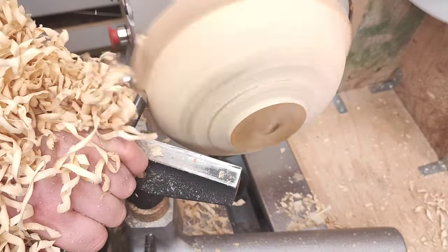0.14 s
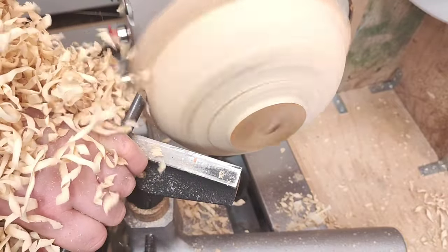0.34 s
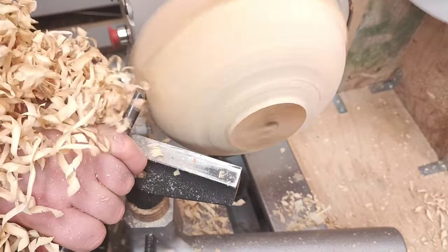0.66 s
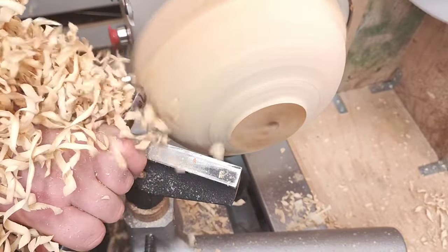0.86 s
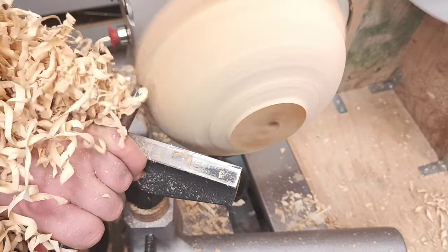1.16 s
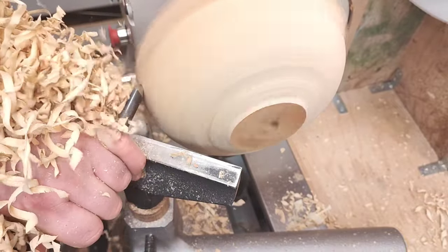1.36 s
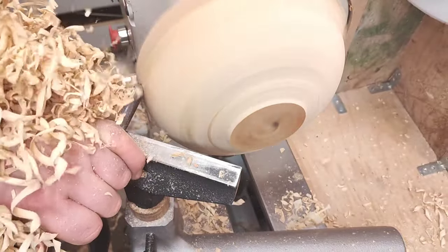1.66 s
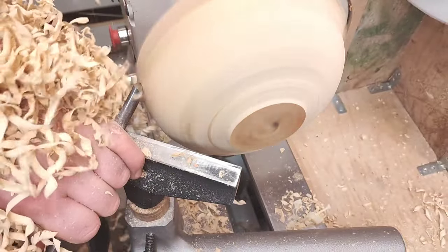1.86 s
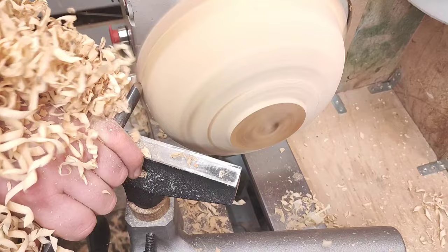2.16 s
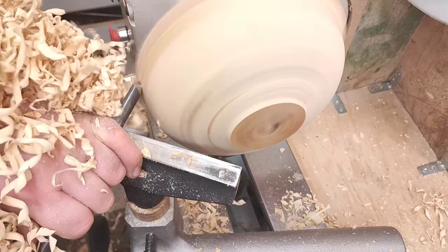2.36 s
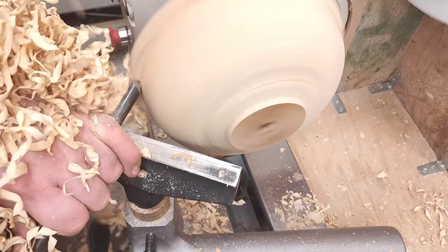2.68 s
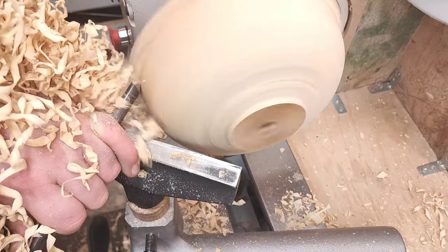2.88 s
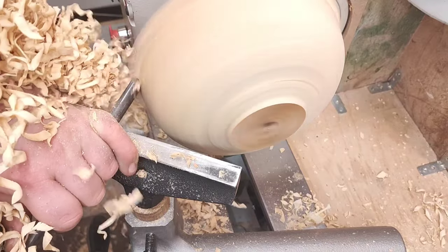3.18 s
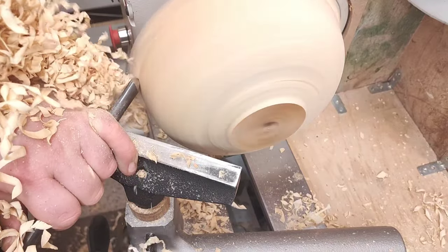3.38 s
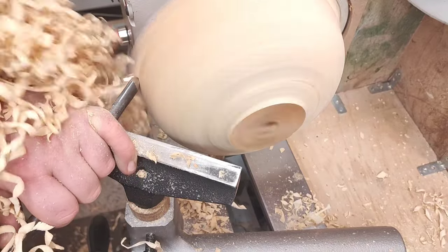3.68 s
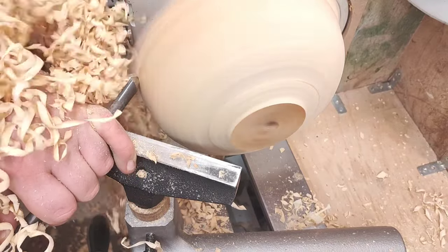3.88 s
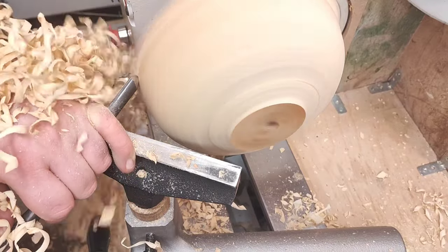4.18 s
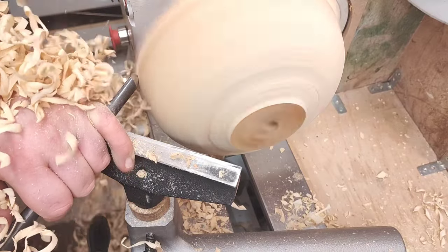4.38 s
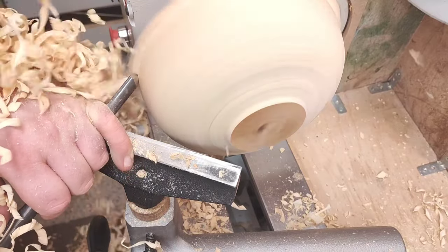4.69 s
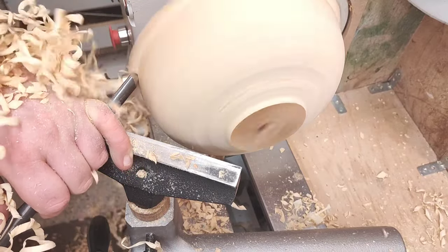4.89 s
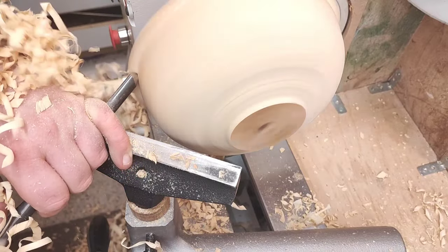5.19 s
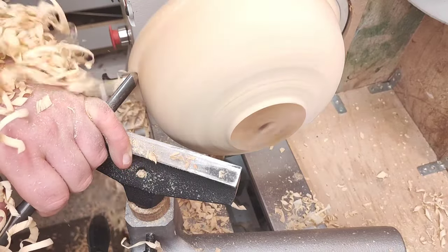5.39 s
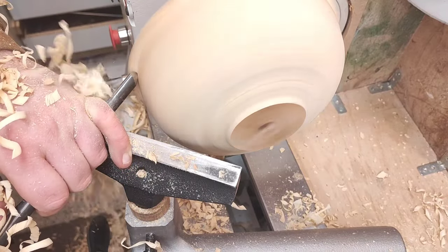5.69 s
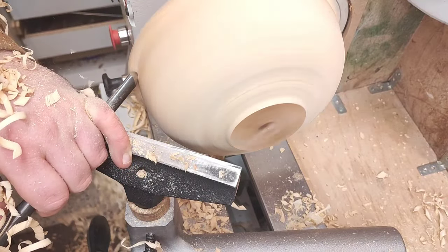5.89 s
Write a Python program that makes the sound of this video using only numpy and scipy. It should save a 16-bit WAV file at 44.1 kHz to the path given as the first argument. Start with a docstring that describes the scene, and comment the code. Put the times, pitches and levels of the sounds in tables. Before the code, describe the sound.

A continuous woodturning cut, heard near the tool with a short room tail. It starts heavy and full, gritty slicing with twice-per-turn hissing tears of end grain and a low thrum. Halfway through, a nasal, buzzing chatter of the thinning bowl wall grows. Later the slicing fades, sharp rapid tearing slides downward in pitch, and finally the cut breaks off above the quiet lathe whirr.

```python
"""Wooden bowl on the lathe

A gouge cuts a bowl spinning about twenty times a second: rasp and slicing are noise that partly repeats every turn.
Twice a turn end grain tears with a hiss, a noise burst with a tail that thins into a falling zip near the rim.
Ripples come round every turn and sound as wavering tones: a thrum, then the chatter of the thinning bowl wall.
Motor hum and a filtered whirr lie below, a short room tail follows the cut, and at last the edge leaves the wood."""
import sys
import numpy as np
from scipy import signal
from scipy.fft import rfft, irfft, next_fast_len
from scipy.io import wavfile
from scipy.ndimage import uniform_filter1d

SR = 44100
rng = np.random.default_rng(int(sys.argv[2]) if len(sys.argv) > 2 else 0)


def wav_record(signal):
    """Record a signal, one row per channel, as 16-bit PCM in the file named by sys.argv[1]."""
    frames = np.transpose(np.atleast_2d(signal))
    bounded = np.clip(frames, -1, 1)
    # unit amplitude maps onto the largest positive 16-bit level
    quanta = np.round(bounded * 32767).astype(np.int16)
    wavfile.write(sys.argv[1], SR, quanta)


N = 266805
TIME = np.arange(N) / SR  # s

SPIN_HZ = 19.91
TOP_HZ = 15900  # upper limit of the whole sound

# where in the turn the edge meets end grain: (time [s], first angle [turns], second angle [turns])
END_GRAIN = [(0, .24, .83), (2, .29, .87), (3, .335, .88), (4.2, .345, .878), (4.9, .37, .892),
             (5.25, .378, .903), (5.55, .362, .897), (5.75, .342, .872), (6.05, .32, .862)]
# how hard the end grain tears, before hand pressure:
# (time [s], level [dB], first pass over the smooth slicing [dB], second pass over it [dB])
TEAR = [(0, -25, 0, 0), (1.3, -22.5, -9, 3.5), (1.8, -27, 6, 6.5), (2.5, -25, 1, 7.5), (2.95, -22.5, 5, 7),
        (3.6, -27.5, 5.5, 8), (4.05, -26, 5, 10.5), (4.7, -30, 4, 9.5), (4.95, -28.5, 6, 14.5),
        (5.2, -25, 13, 18.5), (5.42, -21, 22, 22), (5.6, -19.5, 19, 13), (5.8, -24, 15.5, 8),
        (6.0, -29.5, 11, 15)]
# the thinning shaving's zip: (time [s], pitch [Hz], share of the tearing's power [0-1])
ZIP = [(3.4, 15500, 0.07), (4.55, 14400, 0.04), (4.85, 13400, 0.46), (5.07, 11800, 0.7),
       (5.25, 10300, 0.93), (5.43, 8700, 1), (5.62, 6600, 0.33), (5.8, 4750, 0.29), (6.05, 3880, 0.03)]
# ripples that drive the low wall mode: (ripples [per turn], heavy cut [dB], light cut [dB])
LOW_RIPPLES = [(36, -8, -14), (37, -4, -14), (38, -10, -9), (39, -3, -1), (40, 0, 0), (41, -12, -12),
               (42, -9, -6), (45, -11, -15), (48, -12, -16)]
# ripples that drive the high wall mode: (ripples [per turn], heavy cut [dB], light cut [dB])
HIGH_RIPPLES = [(66, -15, -12), (67, -5, -7), (68, -3, -3), (69, -6, -12), (70, -13, -12), (71, -7, -10),
                (72, -11, -11), (73, 0, 0), (74, -9, -15), (75, -4, -16), (77, -7, -11), (79, -11, -13),
                (82, -13, -16)]
# resonances of bowl, gouge and rest under the rasp:
# (centre [Hz], width [Hz], peak near the foot [dB], peak near the rim [dB])
RINGS = [(785, 250, 8, 13.5), (1605, 230, 6.5, 5.5), (1832, 78, 8, 5), (2190, 37, 12.5, 10),
         (2284, 45, 11, 2.5), (2390, 74, 3.5, 1), (2802, 173, 6.5, 10), (3250, 110, 9.5, 10)]
# colour of the edge rasping through wood: (frequency [Hz], density [dB per Hz])
RASP = [(150, -41), (600, -22.5), (1050, -8.5), (1250, -3.5), (1600, 1.5), (2000, -1), (2500, -0.5),
        (3100, -9.5), (4000, -7.5), (7000, -52)]
# colour of the shaving sliding up the flute: (frequency [Hz], density [dB per Hz])
SLICE = [(1500, -64), (2800, -4), (3500, -0.5), (4400, -2), (5300, 0), (6300, -2.5), (7500, 0),
         (11000, -26), (16000, -40)]
# colour of torn end grain: (frequency [Hz], density [dB per Hz])
HISS = [(2000, -30), (4500, -25), (6400, -7.5), (7300, -2), (8300, 3), (9700, -1), (11200, -1.5),
        (12300, -5), (14000, -7.5), (16000, -26)]
# colour of the rumble under the cut: (frequency [Hz], density [dB per Hz])
RUMBLE = [(20, -37), (62, -46), (80, -12), (140, -11.5), (190, -4.5), (260, 0), (420, -0.5), (600, -2.5),
          (780, 6), (1050, -4), (1200, 4), (1700, -0.5), (3500, -51)]
# colour of belt and bearings: (frequency [Hz], density [dB per Hz])
IDLE = [(30, -32), (60, -28), (100, -16), (300, -0.5), (480, -2.5), (800, 6.5), (1500, 8.5), (3000, -12.5),
        (8000, 5), (16000, -34)]
# room tail: (frequency [Hz], time to fall by 60 dB [s])
WORKSHOP = [(200, 0.25), (1500, 0.52), (6000, .18), (15000, 0.049)]
# sets of ripples that bounce the gouge on its rest: (start [s], end [s], ripples [per turn], level [dB])
THRUM = [(-.1, 0.505, 14, -43.5), (1.22, 1.498, 14, -42.5), (1.22, 1.65, 20, -50), (1.503, 1.98, 14, -39),
         (1.895, 3.2, 17, -46.5), (1.9, 2.8, 57, -45), (1.9, 2.8, 60, -41), (2.75, 4.35, 33, -46.5),
         (2.118, 3.12, 20, -43), (2.683, 4.32, 14, -40), (3.348, 4.3, 17, -43.5), (3.65, 4.3, 20, -47),
         (4.3, 5.1, 17, -47), (4.8, 5.25, 20, -54), (5.1, 6.2, 17, -55), (5.1, 6.2, 57, -51),
         (5.5, 6.2, 14, -52)]
# resonances of the gouge's flute: (centre [Hz], width [Hz], peak [dB])
FLUTE = [(4250, 260, 4.5), (4710, 250, 5), (5220, 82, -4), (6070, 86, 4.5)]
# narrow resonances of tool rest and lathe bed: (centre [Hz], width [Hz], peak [dB])
BED = [(293, 45, 7.5), (489, 56, 6), (1135, 14, 2), (1194, 16, 8.5), (1254, 18, 6)]
# brightness of the rasp: (time [s], tilt of upper against lower part [dB])
BITE = [(0, 4.5), (.35, 3.5), (.65, -.3), (1.4, 2), (1.9, -4), (2.2, -1), (2.4, 3.5), (3, 2.5), (3.4, -1.5),
        (5, -0.5), (5.7, -3.5)]
# depth of cut, shallower towards the rim: (time [s], depth [dB])
DEPTH = [(0, 0.5), (.55, -.5), (1.1, 0.06), (1.7, -2.5), (2.15, -2.2), (2.4, -3.5), (3.0, -2), (3.6, -4),
         (4.15, -4.5), (4.9, -9.5), (5.35, -13.5), (5.75, -13.5), (5.98, -12.5)]
# the hand pushes (+) or eases (-) the gouge for a moment: (centre [s], length [s], push [dB])
NUDGES = [(0.073, 0.073, -4), (0.153, 0.092, 0.5), (.52, .08, -0.2), (0.653, 0.16, 1.3), (0.785, .08, -2),
          (1.462, 0.072, -2.6), (1.56, 0.07, 1.7), (1.78, 0.043, -1.5), (1.81, 0.019, 3), (1.88, 0.018, 3),
          (2.21, 0.088, 1.4), (2.3, 0.11, -1.5), (2.472, 0.049, 1.5), (2.608, 0.055, -2.5),
          (3.06, 0.062, 1), (3.216, 0.24, -2), (3.492, 0.069, 2.5), (3.66, 0.068, -2.5), (4.13, 0.062, 1.4),
          (4.478, .04, 1.3), (4.56, .08, -2.2), (4.664, .08, 1.5), (4.893, .05, -2), (5.086, 0.037, 4.5),
          (5.957, 0.11, 3)]
# growth of the low wall mode as the wall thins:
# (start [s], full [s], level before [dB], level when full [dB], answer to depth [dB per dB])
LOW_CHATTER = (2.5, 4, -42.5, -29.5, 0.14)
# growth of the high wall mode, same columns:
# (start [s], full [s], level before [dB], level when full [dB], answer to depth [dB per dB])
HIGH_CHATTER = (1.98, 3.5, -45, -19.5, 0.78)
# brightness of the tearing above 11.5 kHz: (time [s], level [dB])
TREBLE = [(0, 0), (1.4, -5.5), (1.9, 1.5), (3.6, 0), (4.4, 8), (5.1, 2), (5.5, -8), (5.9, -2.5)]

# the edge leaves the wood: the cut dies at once, the wall rings down
LEAVE_S, CUT_FADE_DB_PER_S, WALL_FADE_DB_PER_S = 5.998, 750, 170
# the edge passes from the stiff foot to the thin wall near the rim
FOOT_UNTIL_S, RIM_FROM_S = 2, 2.72
# depths between which a heavy cut turns into a light one
HEAVY_DB, LIGHT_DB = -4, -8.5
# base levels, before depth, hand and load move them
RASP_DB, SLICE_DB, RUMBLE_DB, HUM_DB = -22.5, -24, -34, -54.5
THRUM_FADE_S = 0.22


def amp(db):
    """Decibels to gain."""
    return 10 ** (np.asarray(db) / 20)


def unit(x):
    """Scaled to rms 1."""
    return x / np.sqrt(np.mean(x ** 2) + 1e-20)


def along(points, hz):
    """(Hz, value) points read on a log axis."""
    f, v = np.transpose(points)
    return np.interp(np.log(hz + 1), np.log(f + 1), v)


def curves(rows):
    """One value per sample for each column after the time."""
    s, *cols = np.transpose(rows)
    return [np.interp(TIME, s, c) for c in cols]


def ramp(start_s, end_s):
    """From 0 to 1 between two moments."""
    return np.clip((TIME - start_s) / (end_s - start_s), 0, 1)


def wobble(rate):
    """A smooth random curve, rate knots a second."""
    knots = 1.15 * rng.standard_normal(int(N * rate / SR) + 4)
    i = (TIME * rate).astype(int)
    u = TIME * rate - i
    ease = u * u * (3 - 2 * u)
    return knots[i] + (knots[i + 1] - knots[i]) * ease


def filtered(x, response):
    """x times a response of frequency."""
    m = next_fast_len(N + SR // 4)
    hz = np.fft.rfftfreq(m, 1 / SR)
    return irfft(rfft(x, m) * response(hz), m)[:N]


def coloured(x, spectrum, rings=()):
    """x through a spectrum with resonant peaks on top, at rms 1."""
    def response(hz):
        peaks_db = sum(db / (1 + (2 * (hz - centre) / width) ** 2) for centre, width, db in rings)
        return amp(along(spectrum, hz) + peaks_db)
    return unit(filtered(x, response))


def surface(memory):
    """Roughness under the edge: each turn keeps a share of what the last turn left behind."""
    keep, period = np.clip(memory, 0, .995), round(SR / SPIN_HZ)
    fresh = rng.standard_normal((N // period + 2, period))
    renewal = np.sqrt(1 - keep ** 2)  # holds the loudness steady
    turns = signal.lfilter([renewal], [1, -keep], fresh[1:], axis=0, zi=keep * fresh[:1])[0]
    return turns.ravel()[:N]


def passing(angle, rise, fall):
    """A swell each time the given angle of the bowl passes the edge; rise and fall in turns."""
    away = (SPIN_HZ * TIME - angle + .5) % 1 - .5
    return np.exp(-np.minimum(away / rise, 0) ** 2 - np.maximum(away / fall, 0))


def per_turn(power):
    """A power pattern as a gain, levelled by its average power over a turn."""
    return np.sqrt(power / uniform_filter1d(power, round(SR / SPIN_HZ)))


def patchy(x, depth_db):
    """x with short random resonances: the curling shaving keeps changing its shape."""
    z = signal.stft(x, SR, nperseg=512)[2]
    field = uniform_filter1d(rng.standard_normal(z.shape), size=4, axis=0)
    field = uniform_filter1d(field, size=10, axis=1)
    return unit(signal.istft(z * amp(depth_db * unit(field)), SR, nperseg=512)[1][:N])


def line(lobes, wander, phase=None):
    """A whole number of ripples per turn sounds as a tone whose phase wanders as they are recut."""
    phase = 2 * np.pi * rng.random() if phase is None else phase
    turning = 2 * np.pi * round(lobes) * SPIN_HZ * TIME
    return np.sqrt(2) * np.sin(turning + phase + wander * wobble(2.85))


def pressure(follow, fade_db_per_s):
    """Drive in dB: a share of the depth of cut, the hand's nudges, and the fade once the edge is out."""
    nudges = sum(db * np.exp(-(2 * (TIME - s) / length) ** 2) for s, length, db in NUDGES)
    fade = fade_db_per_s * np.maximum(TIME - LEAVE_S, 0)
    return follow * curves(DEPTH)[0] + nudges - fade


def lightness():
    """0 in a heavy cut, 1 in a light one."""
    return np.clip((curves(DEPTH)[0] - HEAVY_DB) / (LIGHT_DB - HEAVY_DB), 0, 1)


def spindle_load(leverage_db=3):
    """Load in dB: it grows with the depth of cut and with the radius at which the edge works."""
    return pressure(follow=1.21, fade_db_per_s=0) + leverage_db * ramp(0, FOOT_UNTIL_S)


def lathe():
    """The motor's wavering hum grows with the load, over the spindle's throb; belt and bearings whirr."""
    motor = np.sqrt(2) * np.sin(2 * np.pi * 100 * TIME + .3 * wobble(8))
    spindle = line(4, wander=.6) + line(6, wander=.6)
    hum_db = HUM_DB + .6 * spindle_load() + 2.0 * wobble(15)
    hum = amp(hum_db) * (motor + amp(-15.5) * spindle)
    whirr = amp(-39) * coloured(surface(memory=0.62), IDLE)
    return hum + whirr


def uphill(depth, lag, rise, fall):
    """Just after each end grain the edge works against the fibres, and the cut swells."""
    swells = sum(passing(angle + lag * late, rise, fall)
                 for angle, late in zip(curves(END_GRAIN), (1, .35)))
    return per_turn(1 + abs(depth) * swells * amp(4.7 * wobble(40)))


def slicing():
    """The edge rasps through the wood and rings bowl and gouge; the shaving slides up the flute."""
    foot_rings = [(hz, width, db) for hz, width, db, _ in RINGS]
    rim_rings = [(hz, width, db) for hz, width, _, db in RINGS]
    at_foot = coloured(surface(memory=0.41), RASP, foot_rings)
    at_foot = patchy(at_foot, depth_db=2) * uphill(depth=3.0, lag=0.24, rise=0.092, fall=0.12)
    at_rim = coloured(surface(memory=0.65), RASP, rim_rings)
    rim = ramp(FOOT_UNTIL_S, RIM_FROM_S)
    rasp = np.sqrt(1 - rim) * at_foot + np.sqrt(rim) * at_rim
    # tilt the rasp around 2100 Hz
    upper = filtered(rasp, lambda hz: 1 / (1 + (2100 / (hz + 1)) ** 12))
    bite_db = curves(BITE)[0]
    rasp = amp(-bite_db / 2) * (rasp - upper) + amp(bite_db / 2) * upper
    slide = coloured(surface(memory=0.39) * amp(1.5 * wobble(700)), SLICE, FLUTE)
    slide = patchy(slide, depth_db=2.0) * uphill(depth=19, lag=0.1, rise=0.069, fall=0.18)
    rasp_db = RASP_DB + pressure(follow=1, fade_db_per_s=WALL_FADE_DB_PER_S)
    slice_db = SLICE_DB + pressure(follow=1.15, fade_db_per_s=CUT_FADE_DB_PER_S)
    return amp(rasp_db) * rasp + amp(slice_db) * slide


def fibres(rough_db):
    """Noise of countless snapping fibres, which come in small clumps."""
    return rng.standard_normal(N) * amp(rough_db * wobble(780))


def tearing():
    """End grain tears twice a turn in a short burst, trailed by the hiss of the shaving."""
    level_db, *passes_db = curves(TEAR)
    pitch_hz, share = curves(ZIP)
    share = np.clip(share, 0, 1)
    light = lightness()
    power = 0.11  # between the passes
    lengths = (.04 - .012 * light, .034 - .016 * light)  # turns: a light cut tears more briefly
    for angle, burst_db, length in zip(curves(END_GRAIN), passes_db, lengths):
        angle = angle + .005 * wobble(20)
        burst = amp(burst_db + 1.6 * wobble(17)) ** 2
        power = power + burst * passing(angle, rise=.75 * length, fall=length)
        power = power + (1 + .035 * burst) * passing(angle + .11, rise=.08, fall=.12)
    hiss = coloured(fibres(rough_db=-1.5), HISS)
    zip_noise = zipping(pitch_hz, width=0.23, above_db=4, slope_db=-10.5)
    noise = patchy(np.sqrt(1 - share) * hiss + np.sqrt(share) * zip_noise, depth_db=1.87)
    # the treble flickers
    treble = filtered(noise, lambda hz: 1 / (1 + (11500 / (hz + 1)) ** 8))
    noise = noise + (amp(curves(TREBLE)[0] + 0.48 * wobble(90)) - 1) * treble
    tear_db = level_db + pressure(follow=0, fade_db_per_s=CUT_FADE_DB_PER_S) + 0.51 * wobble(22)
    return amp(tear_db) * per_turn(power) * noise


def thrum():
    """Ripples build up under the bouncing gouge, sound as wavering tones and are cut away again."""
    counts = sorted({round(row[2]) for row in THRUM})
    tones = {lobes: line(lobes, wander=.35) * amp(0.95 * wobble(9)) for lobes in counts}
    half = THRUM_FADE_S / 2
    total = 0
    for start, end, lobes, db in THRUM:
        presence = ramp(start - half, start + half) - ramp(end - half, end + half)
        total = total + amp(db) * presence * tones[round(lobes)]
    return total * amp(pressure(follow=0, fade_db_per_s=WALL_FADE_DB_PER_S))


def rumble():
    """Deep roughness that largely repeats with the turn, rings rest and bed and follows the load."""
    level_db = RUMBLE_DB + spindle_load() + 0.86 * wobble(14)
    return amp(level_db) * coloured(surface(memory=0.78), RUMBLE, BED)


def workshop(x):
    """A short room tail that lasts longest in the middle range and dies fastest in the treble."""
    hz, t, z = signal.stft(rng.standard_normal(SR // 3), SR, nperseg=256)
    decay_db = -60 * t / along(WORKSHOP, hz)[:, None]
    tail = signal.istft(z * amp(decay_db), SR, nperseg=256)[1]
    tail = np.pad(tail, (round(.004 * SR), 0))  # 4 ms before the room answers
    return signal.fftconvolve(x, tail / np.linalg.norm(tail))[:N]


def ripple(table, mode_hz, width_hz, knock_angle, scatter, wander_db):
    """A wall mode near rms 1, knocked at one angle of each turn; its ripples vary more in a heavy cut."""
    light = lightness()
    unrest = 1 - 0.49 * light
    tone, power = 0, 0
    for lobes, heavy_db, light_db in table:
        gain = amp(heavy_db + (light_db - heavy_db) * light + wander_db * unrest * wobble(4))
        # the mode lags behind the knock, the more so above its resonance
        detuning = 2 * (round(lobes) * SPIN_HZ - mode_hz) / width_hz
        lag = 2 * np.pi * round(lobes) * knock_angle + np.arctan(detuning)
        phase = scatter * (1 + unrest) * rng.normal() - lag
        tone = tone + gain * line(lobes, wander=0.25 * unrest, phase=phase)
        power = power + gain ** 2
    return tone / np.sqrt(power)


def chatter(start_s, full_s, before_db, full_db, follow):
    """Swing of a wall mode: it grows steadily as the wall thins and answers the pressure of the cut."""
    swing = amp(before_db) + (amp(full_db) - amp(before_db)) * ramp(start_s, full_s)
    return swing * amp(pressure(follow, WALL_FADE_DB_PER_S))


def bowl_wall():
    """Ripples shake the bowl wall in two modes, and the uneven contact with the bevel adds a buzz."""
    high = ripple(HIGH_RIPPLES, mode_hz=1457, width_hz=41, knock_angle=.1, scatter=1.094, wander_db=1.4)
    low = ripple(LOW_RIPPLES, mode_hz=789, width_hz=15, knock_angle=.72, scatter=0.34, wander_db=2)
    wall = chatter(*HIGH_CHATTER) * high + chatter(*LOW_CHATTER) * low
    # the bevel presses unevenly on the swinging wall, which adds sum tones
    buzz = 2.06 * filtered(wall ** 2, lambda hz: hz > 1900)
    return wall + buzz


def zipping(pitch_hz, width, above_db, slope_db):
    """Noise in a gliding resonance, dark below it, with a skirt above that falls by slope_db an octave."""
    hz, s, z = signal.stft(fibres(rough_db=-1.6), SR, nperseg=256)
    octaves = np.log2((hz[:, None] + 1) / np.interp(s, TIME, pitch_hz))
    resonance = 1 / (1 + (octaves / width) ** 2)
    skirt = amp(above_db + slope_db * np.abs(octaves)) * (1 + np.tanh(octaves / width)) / 2
    gain = (resonance + skirt) * (hz[:, None] < TOP_HZ)
    steady = gain / np.linalg.norm(gain, axis=0)  # same power at every pitch
    return unit(signal.istft(z * steady, SR, nperseg=256)[1][:N])


def scene():
    """The cut close by, with its room answer, over bowl and machine."""
    machine = lathe()
    cut = slicing() + tearing()
    bowl = thrum() + rumble() + bowl_wall()
    return (machine + cut + amp(-14) * workshop(cut) + bowl)[None]


def record(dry):
    """Rounds off the highest peaks, thins the deep bass and stops the treble at the band limit."""
    rounded = dry[0] / (1 + np.abs(dry[0] / .56) ** 6) ** (1 / 6)
    thinned = filtered(rounded, lambda hz: hz / np.hypot(hz, 45))
    return filtered(thinned, lambda hz: 1 / np.sqrt(1 + (hz / TOP_HZ) ** 200))[None]


dry = scene()
out = record(dry)
wav_record(out)
```